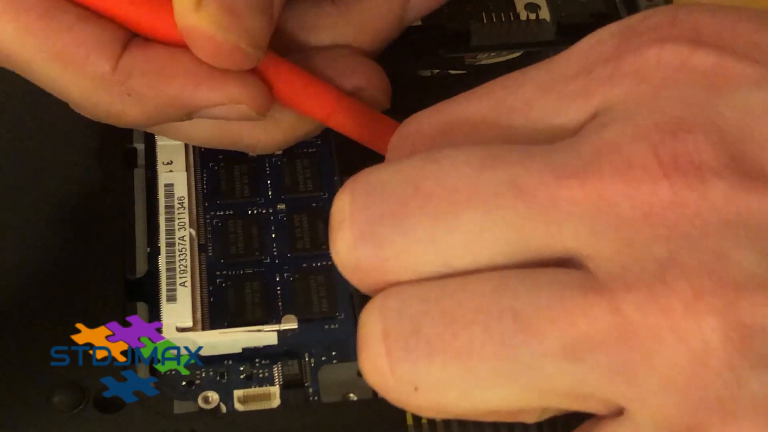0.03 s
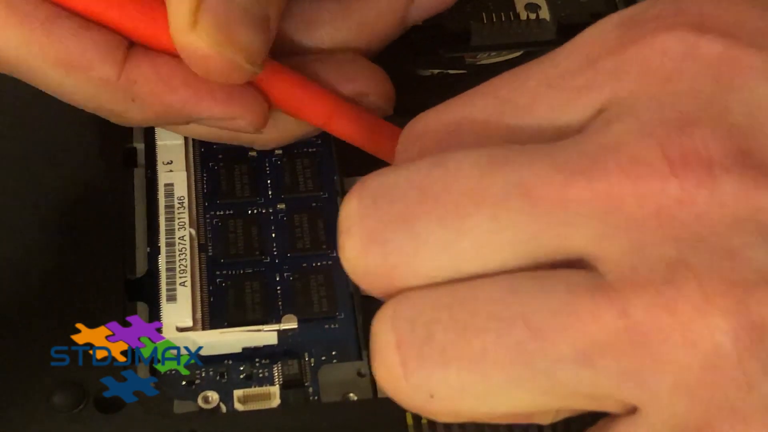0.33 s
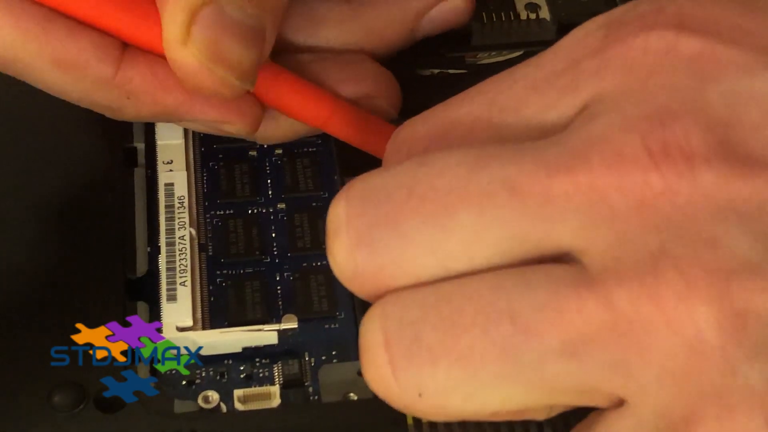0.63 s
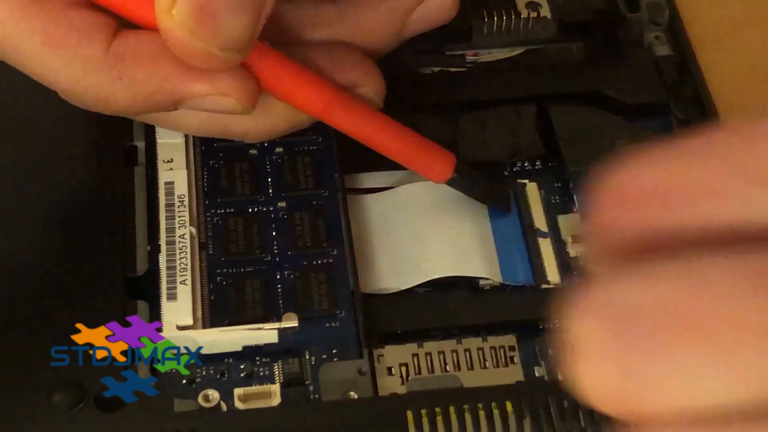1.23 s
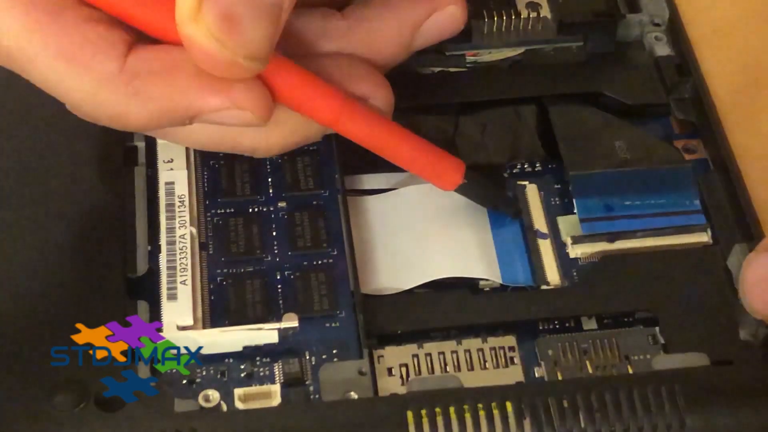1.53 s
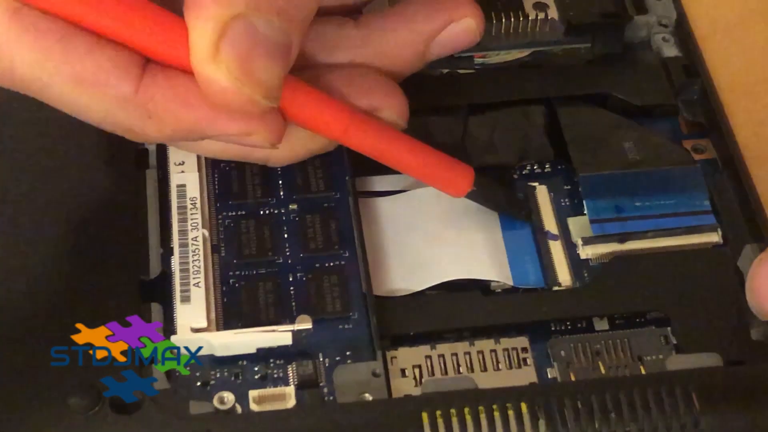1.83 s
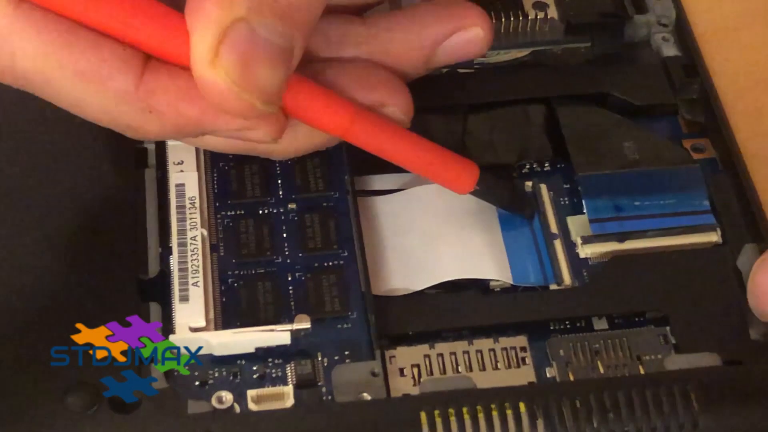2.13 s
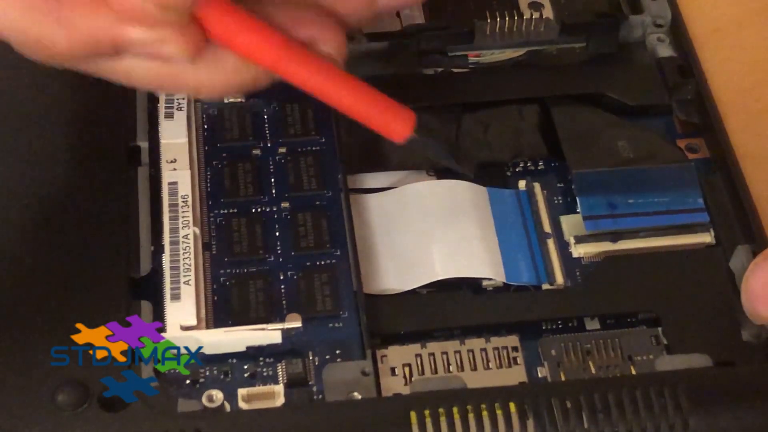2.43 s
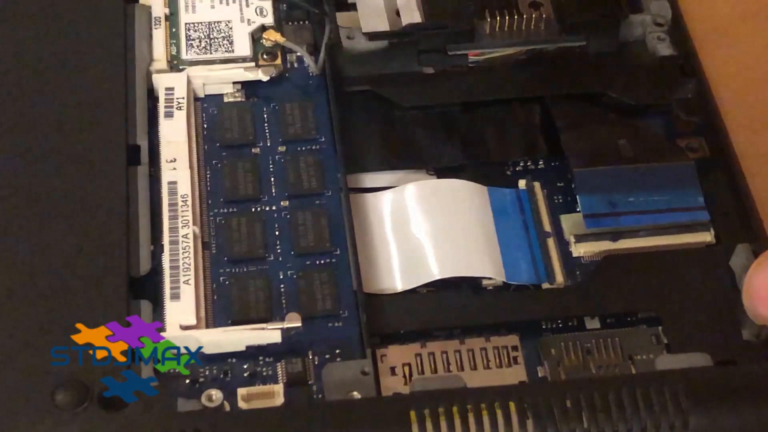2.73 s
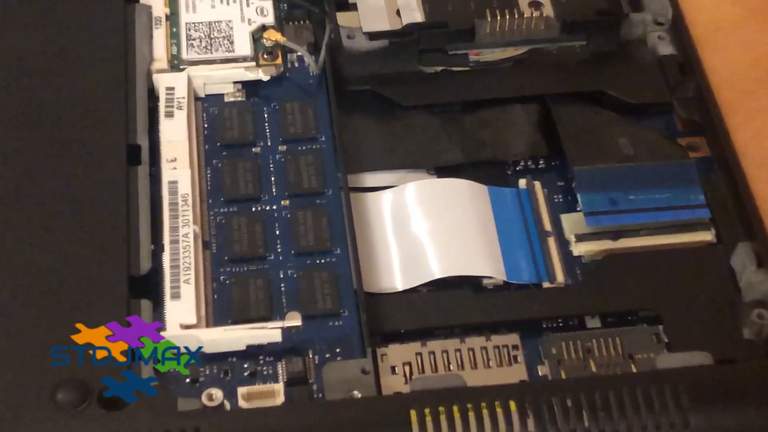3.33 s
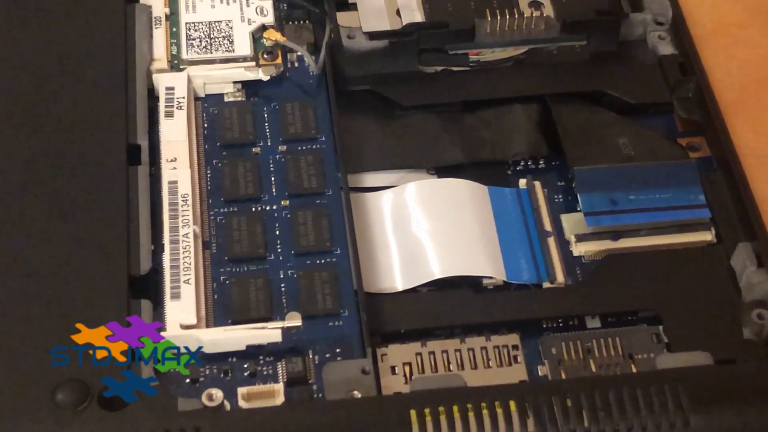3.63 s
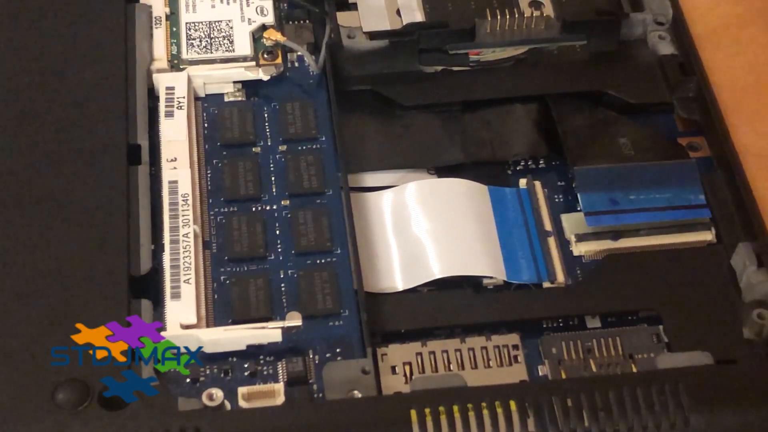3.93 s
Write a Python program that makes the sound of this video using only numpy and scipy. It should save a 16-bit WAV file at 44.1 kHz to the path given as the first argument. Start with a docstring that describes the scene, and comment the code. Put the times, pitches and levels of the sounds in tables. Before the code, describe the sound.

Two sharp plastic clicks of a laptop's cable connector, then something knocks on a desk.

```python
"""Close work inside an opened laptop

In a small room a finger snaps a ribbon cable connector home; a plastic tool ticks and rubs against it
and flicks its latch shut. Each snap is ringing modes, a crack and a buzz; the case gives dully under
the hand. The hand slides away with a hiss of friction, then something heavier is set down, striking
the desk's modes, and settles with a soft bump and a tap."""
import sys
import numpy as np
from scipy import signal
from scipy.fft import rfft, irfft
from scipy.io import wavfile
from scipy.ndimage import uniform_filter1d

SR = 44100
rng = np.random.default_rng(int(sys.argv[2]) if len(sys.argv) > 2 else 0)


def unload_audio(sound):
    """Save the sound as a 16-bit wav file, at the path given as the first command line argument."""
    columns = np.transpose(np.atleast_2d(sound))
    # keep every value between -1 and 1, then stretch to whole-number steps
    steps = np.round(np.clip(columns, -1, 1) * 32767)
    wavfile.write(sys.argv[1], SR, steps.astype(np.int16))


N = 176400


def amp(db):
    """Decibels to gain."""
    return 10 ** (np.asarray(db) / 20)


def at_hz(points, hz):
    """Read a table on a log-frequency axis."""
    freqs, values = np.transpose(points)
    return np.interp(np.log(hz + 1e-9), np.log(freqs), values)


def place(sound, start_s, db=0):
    """Start a sound at a time and gain."""
    return amp(db) * np.concatenate([np.zeros(int(start_s * SR)), sound, np.zeros(N)])[:N]


def butter(x, order, hz, kind):
    """Butterworth low-pass or high-pass."""
    return signal.sosfilt(signal.butter(order, hz, kind, fs=SR, output="sos"), x + 1e-18)


def resonate(x, hz, width_hz, db):
    """The part of a sound that one resonance picks out."""
    return amp(db) * signal.lfilter(*signal.iirpeak(hz, hz / width_hz, fs=SR), x)


def hiss(spectrum):
    """Steady coloured noise, rms 1."""
    gain = amp(at_hz(spectrum, np.arange(N // 2 + 1) * SR / N))
    noise = irfft(rfft(rng.standard_normal(N)) * gain, N)
    return noise / noise.std()


def ring(modes):
    """One second of struck modes, alternating in sign."""
    t = np.arange(SR) / SR
    return sum((-1) ** k * amp(db) * np.sin(2 * np.pi * hz * t) * np.exp(-np.log(1000) * t / t60_s)
               for k, (hz, db, t60_s) in enumerate(modes))


def burst(spectrum, t60s, rise_s=0.00016):
    """One second of dense modes: narrow noise bands, each dying at its own rate."""
    t, freqs = np.arange(SR) / SR, np.arange(SR // 2 + 1)
    edges_hz = np.geomspace(50, 17000, 24)
    white = rfft(rng.standard_normal(SR))
    out = 0
    for low, high in zip(edges_hz, edges_hz[1:]):
        hz = np.sqrt(low * high)
        decay = np.exp(-np.log(1000) * t / at_hz(t60s, hz))
        attack = 1 - np.exp(-t / max(rise_s, 0.5 / hz))
        band = irfft(white * ((freqs >= low) & (freqs < high)), SR) * decay * attack
        to_unit_density = np.sqrt(2 * (high - low) / SR / np.sum(band ** 2))
        out += band * to_unit_density * amp(at_hz(spectrum, hz))
    return out


def crack(spectrum, t60_s):
    """A burst whose bands all die together."""
    return burst(spectrum, [(1000, t60_s)])


# Room background. Each row: frequency in Hz, relative density in dB.
RUMBLE_SPECTRUM = [(18, -40.5), (30, -6.5), (95, -2), (245, -3.5), (364, -8.5), (702, -20), (913, -20),
                   (1040, -23.5), (1130, -22.5), (2010, -24), (2410, -29.5), (3060, -28), (4780, -30.5),
                   (16000, -37.5)]

def room_rumble():
    """The room's steady low noise."""
    return amp(-67) * hiss(RUMBLE_SPECTRUM)


# Room decay. Each row: frequency in Hz, T60 in seconds.
ROOM_T60_S = [(100, 1), (400, 0.29), (1500, 0.31), (4000, .33), (9000, 0.22), (15000, 0.16)]

def in_room(blow, tail_spectrum, echo_db, tail_delay_s):
    """A blow, its smeared echo off a nearby surface and the diffuse tail it raises."""
    reflection = place(crack([(1000, echo_db)], t60_s=0.06), start_s=0.0088)
    echo = signal.fftconvolve(blow, reflection)[:N]
    tail = burst(tail_spectrum, ROOM_T60_S, rise_s=0.00033)
    return place(blow, 0) + echo + place(tail, tail_delay_s)


def friction(stroke, spectrum, resonances, grain_db):
    """Resonant hiss that follows a stroke and catches every few milliseconds."""
    noise = hiss(spectrum)
    noise = noise + sum(resonate(noise, *resonance) for resonance in resonances)
    catches = uniform_filter1d(rng.standard_normal(N), size=200)
    level_db = np.interp(np.arange(N) / SR, *np.transpose(stroke), left=-np.inf, right=-np.inf)
    return noise / noise.std() * amp(level_db + grain_db * catches / catches.std())


# Strokes. Each row: time in seconds, level in dB.
TOOL_STROKE_DB = [(1.05, -108), (1.17, -70), (1.24, -96), (1.42, -77), (1.56, -97), (1.68, -73),
                  (1.81, -64.5), (1.90, -71.5), (1.97, -77), (2.18, -88), (2.26, -72.5), (2.36, -90)]
ARM_STROKE_DB = [(2.5, -84), (2.67, -62.5), (2.78, -68.5), (2.95, -64.5), (3.15, -64.5), (3.27, -62),
                 (3.32, -86.5)]
SWISH_STROKE_DB = [(2.6, -84), (2.705, -60.5), (2.75, -86), (2.99, -85), (3.13, -62.5), (3.27, -76),
                   (3.3, -93.5)]
# Friction noise. Each row: frequency in Hz, relative density in dB.
TOOL_SPECTRUM = [(300, 2.5), (800, -1.5), (1900, -2), (3400, -4.5), (5500, -7.5), (8000, -17),
                 (15500, -19.5)]
ARM_SPECTRUM = [(250, 9), (750, -6), (1400, -5), (3100, -9.5), (5000, -9.5), (9000, -19), (15500, -17.5)]
SWISH_SPECTRUM = [(1000, -13), (4000, -1.5), (8000, 1), (11000, -2), (15500, -0.5)]
# Friction resonances. Each row: centre in Hz, width in Hz, gain in dB.
TOOL_PEAKS = [(1330, 120, 2.5), (2720, 240, 1.5)]
ARM_PEAKS = [(920, 81, -2.5), (1220, 160, -1), (2150, 330, 2), (4300, 400, -4.5), (6400, 500, -5)]
SWISH_PEAKS = [(11000, 2000, -13.5)]

def rubbing():
    """The tool rubs the connector; the arm slides away with two bright swishes."""
    tool = friction(TOOL_STROKE_DB, TOOL_SPECTRUM, TOOL_PEAKS, grain_db=0.5)
    arm = friction(ARM_STROKE_DB, ARM_SPECTRUM, ARM_PEAKS, grain_db=1.2)
    swishes = friction(SWISH_STROKE_DB, SWISH_SPECTRUM, SWISH_PEAKS, grain_db=0.95)
    return tool + arm + swishes


# Pushes on the case. Each row: start in seconds, gain in dB, low cut in Hz.
CASE_PUSHES = [(0.808, -49.5, 56), (1.319, -57.5, 176), (1.448, -58, 55), (1.997, -47.5, 40)]
# Case modes. Each row: frequency in Hz, level in dB, T60 in seconds.
CASE_RING = [(71, -10, 0.52), (140.7, -1, .18), (217.9, 2.5, .1), (274.5, -2, 0.031), (380, -4.5, 0.21)]

def case_thuds():
    """The case gives dully under the hand; a higher low cut leaves its deepest modes still."""
    thud = butter(ring(CASE_RING), 2, 500, "low")
    return sum(place(butter(thud, 4, low_hz, "high"), start_s, db) for start_s, db, low_hz in CASE_PUSHES)


# Touches. Each row: start in seconds, bass, middle and treble density in dB, resonance in Hz,
# T60 in seconds.
TOUCHES = [(0.086, -28.5, -29.5, -36.5, 8050, 0.016), (0.093, -29.5, -35, -36, 1400, 0.057),
           (0.141, -59, -45, -54.5, 8400, .01), (0.297, -39, -45, -47, 1140, 0.015),
           (1.014, -34, -38.5, -38.5, 2550, 0.01), (1.092, -54, -52, -53, 11000, 0.0036),
           (1.119, -52, -58, -48, 6000, 0.0079), (1.139, -51, -39.5, -41.5, 4060, .04),
           (1.175, -26, -39.5, -40, 3500, 0.017), (1.181, -34, -38, -42, 1490, .07),
           (1.376, -53, -42, -35, 13000, 0.014), (1.4458, -26, -37.5, -44, 15100, 0.0062),
           (1.449, -24.5, -37.5, -49, 860, 0.099), (1.609, -16.5, -33, -56, 533, 0.017),
           (1.657, -46, -44, -53, 2600, .012), (1.694, -33, -43.5, -41, 7600, 0.0021),
           (1.795, -39.5, -26, -39, 2450, 0.021), (1.9662, -53, -47.5, -45, 9400, .008),
           (1.9843, -50.5, -39.5, -38, 13000, 0.022), (2.395, -37, -46, -47, 4300, 0.071),
           (3.015, -42, -37, -41, 2100, 0.035), (3.567, -45, -44, -67, 4930, 0.0093),
           (3.703, -25.5, -42, -62, 1050, 0.033)]

def ticks():
    """Light touches of tool and fingernail, each coloured by a resonance of the part touched."""
    bands_hz, resonance_q = (600, 3500, 12000), 5.2
    out = 0
    for start_s, *bands_db, hz, t60_s in TOUCHES:
        spectrum = list(zip(bands_hz, bands_db))
        contact = crack(spectrum, t60_s)
        tail = amp(-9) * burst(spectrum, ROOM_T60_S, rise_s=0.004)
        tick = contact + tail
        out += place(tick + resonate(tick, hz, hz / resonance_q, db=5.5), start_s)
    return butter(out, 2, 450, "high")


# Blows on the desk. Each row: start in seconds, gain in dB, contact low-pass in Hz.
DESK_BLOWS = [(3.2815, -0.5, 16700), (3.635, -15.5, 220)]
# Modes of the desk and the last tap. Each row: frequency in Hz, level in dB, T60 in seconds.
DESK_RING = [(69.2, -41, 0.36), (130, -33, 0.5), (212.3, -32, 0.2), (373.8, -26, 0.13), (493, -24.5, 0.065),
             (671.7, -21.5, .11), (764, -12, 0.03), (944, -29, .07), (1124, -24.5, .05), (1220, -15.5, .03),
             (1344, -19.5, 0.093), (1555, -26.5, .06), (1964, -27, .045), (2170, -20.5, 0.052)]
TAP_RING = [(181.7, -51.5, 0.25), (667, -48.5, 0.1), (836, -50.5, 0.043), (1360, -55.5, 0.062),
            (1660, -50.5, 0.025), (2500, -54.5, 0.012), (4100, -60, 0.0094)]
# Dense desk clatter and room tails. Each row: frequency in Hz, density in dB.
CLATTER_SPECTRUM = [(80, 2), (300, 18), (700, 14.5), (1250, 19), (2200, 17.5), (3000, 9), (4000, 4.5),
                    (6000, -2), (10000, -15), (15500, -15)]
DESK_TAIL_SPECTRUM = [(50, -2.5), (130, 11), (300, 12), (500, 11.5), (750, 14.5), (1300, 14), (2200, 8),
                      (3200, -7), (4400, -10), (6500, -16.5), (10000, -24), (15000, -28.5)]
TAP_TAIL_SPECTRUM = [(200, -10), (700, -23), (1600, -27.5), (3000, -39), (8000, -48), (15000, -59)]
# Clatter decay. Each row: frequency in Hz, T60 in seconds.
CLATTER_T60_S = [(100, 0.064), (700, 0.032), (2000, .028), (4000, 0.027), (14000, 0.021)]

def desk_knocks():
    """One hard knock, a padded bump that wakes only the low modes, and a last light tap."""
    echo_db = -15.5
    tap = in_room(ring(TAP_RING), TAP_TAIL_SPECTRUM, echo_db, tail_delay_s=0.0023)
    out = place(tap, start_s=3.816)
    for start_s, db, contact_hz in DESK_BLOWS:
        blow = ring(DESK_RING) + burst(CLATTER_SPECTRUM, CLATTER_T60_S)
        knock = in_room(blow, DESK_TAIL_SPECTRUM, echo_db, tail_delay_s=0.0043)
        out += place(butter(knock, 4, contact_hz, "low"), start_s, db)
    return out


def plastic_snap(modes, spectrum, crack_t60_s):
    """Ringing modes, a sharp crack and a brief buzz of the board."""
    strike = ring(modes) + crack(spectrum, crack_t60_s)
    buzz = amp(-25) * crack(spectrum, t60_s=0.051)
    return strike + buzz


# Connector and latch modes. Each row: frequency in Hz, level in dB, T60 in seconds.
PRESS_RING = [(1524, -45, .03), (1830, -34.5, 0.02), (2255, -35, 0.021), (4090, -27.5, 0.021),
              (4080, -54, 0.23), (5980, -35.5, 0.022), (7760, -20, 0.0055), (9300, -21, 0.0031),
              (12440, -24, .007)]
LATCH_RING = [(1346, -51.5, .05), (1570, -53.5, 0.087), (3600, -38.5, 0.014), (5570, -27, .008),
              (7930, -20, .01), (10700, -18.5, 0.0071), (13430, -17, 0.0042), (14830, -28.5, 0.00804)]
# Their cracks and room tails. Each row: frequency in Hz, density in dB.
PRESS_SPECTRUM = [(150, -22), (350, -16.5), (900, -13.5), (1250, -18.5), (2000, -12), (3000, -11),
                  (4500, -6), (8000, -6), (15500, -6)]
LATCH_SPECTRUM = [(150, -35), (300, -35.5), (700, -20.5), (1400, -38), (2200, -29), (3500, -10),
                  (6000, -0.5), (11000, -3), (15500, -4.5)]
PRESS_TAIL_SPECTRUM = [(60, -13.5), (200, -4.5), (600, -19.5), (1200, -23.5), (1800, -20.5), (3000, -20.5),
                       (4200, -19), (8000, -20.5), (11500, -23), (15000, -27)]
LATCH_TAIL_SPECTRUM = [(60, -3.5), (150, -2.5), (400, -13), (700, -16), (1400, -19), (2100, -22),
                       (3500, -17.5), (6000, -12.5), (9000, -6.5), (10500, -8), (11800, -12.5),
                       (14000, -16), (15500, -12.5)]

def connector():
    """Two sharp plastic snaps: the connector pressed home, then its latch flicked shut."""
    press = plastic_snap(PRESS_RING, PRESS_SPECTRUM, crack_t60_s=0.01)
    press = in_room(press, PRESS_TAIL_SPECTRUM, echo_db=-22, tail_delay_s=0.005)
    latch = plastic_snap(LATCH_RING, LATCH_SPECTRUM, crack_t60_s=0.006)
    latch = in_room(latch, LATCH_TAIL_SPECTRUM, echo_db=-15, tail_delay_s=0.0105)
    return place(press, start_s=0.8054) + place(latch, start_s=1.9885)


def scene():
    """Rubbing, clicks and knocks over the room's rumble, in mono."""
    return (rubbing() + connector() + ticks() + case_thuds() + desk_knocks() + room_rumble())[None]


def record(dry):
    """The microphone drops the deepest rumble; the top is cut steeply."""
    low_cut_hz, stopband_hz = 50, 16860
    top_cut = signal.cheby2(14, 60, stopband_hz, fs=SR, output="sos")
    return signal.sosfilt(top_cut, butter(dry, 2, low_cut_hz, "high"))


dry = scene()
out = record(dry)
unload_audio(out)
```